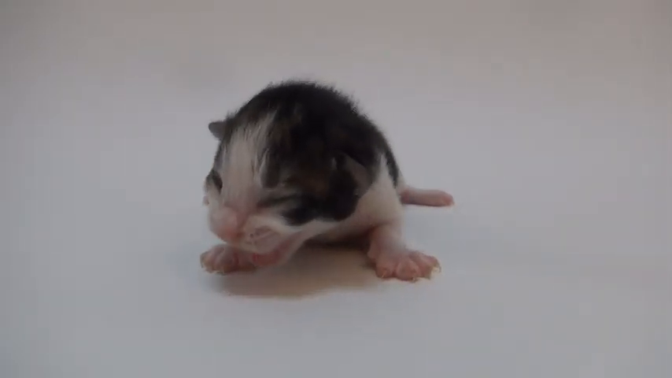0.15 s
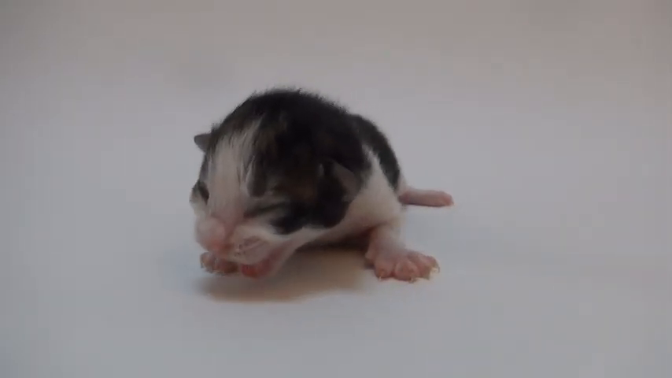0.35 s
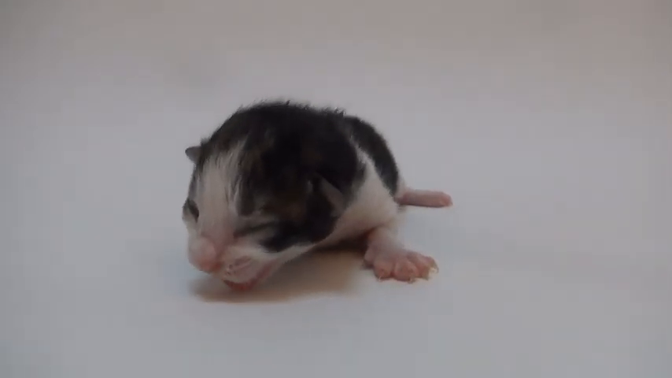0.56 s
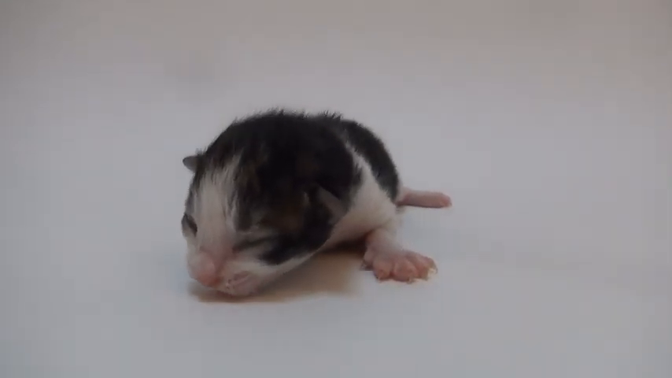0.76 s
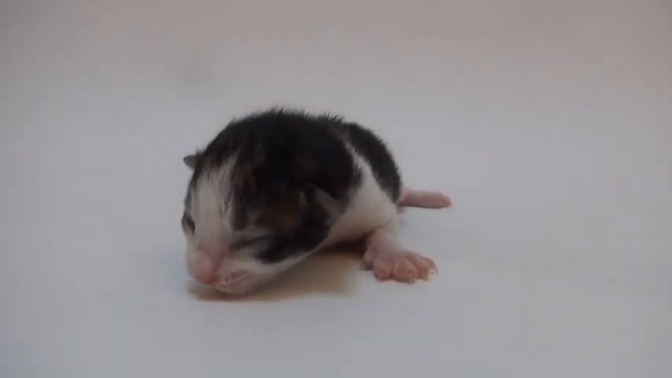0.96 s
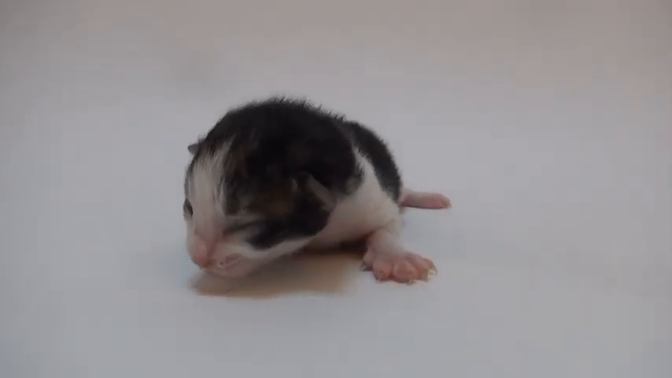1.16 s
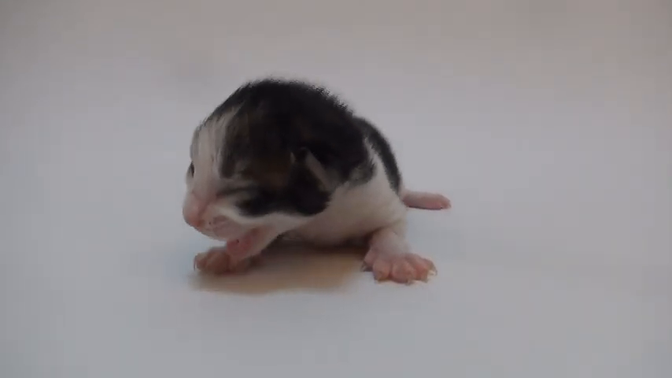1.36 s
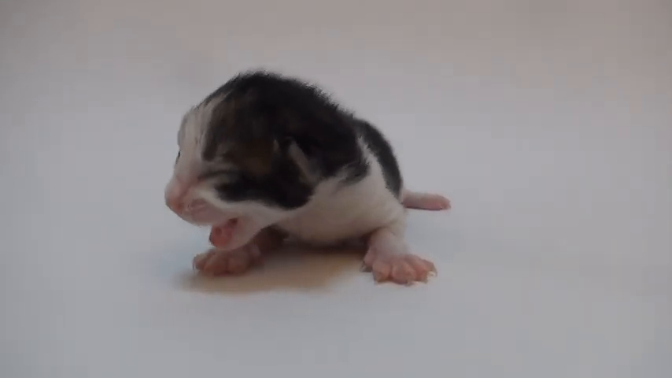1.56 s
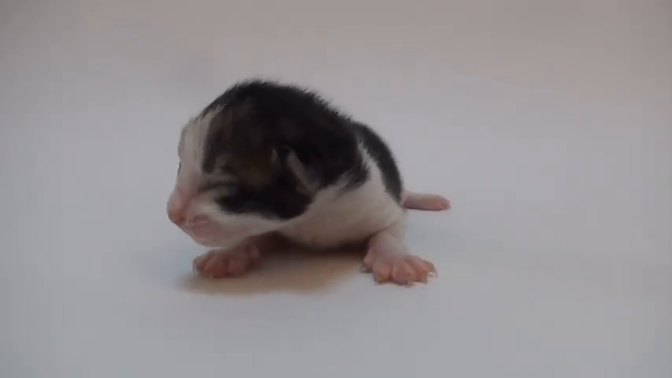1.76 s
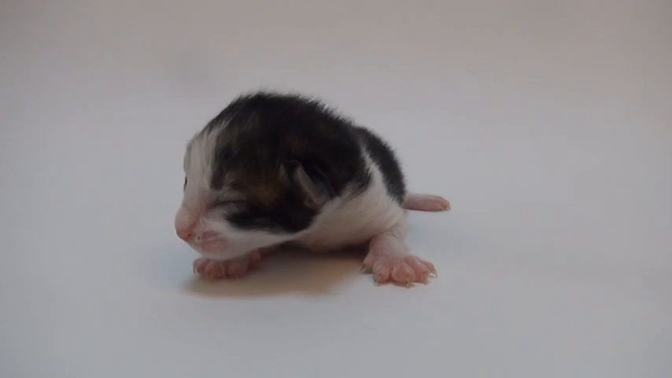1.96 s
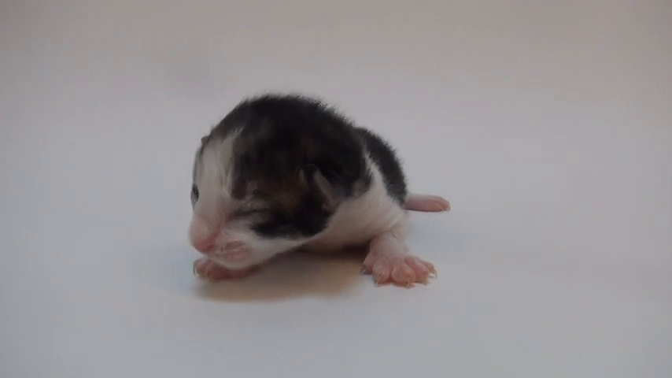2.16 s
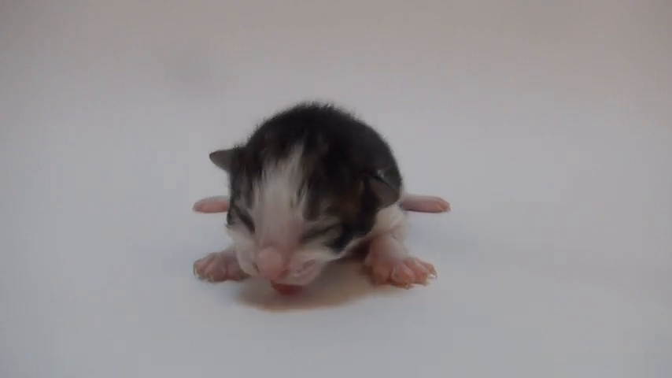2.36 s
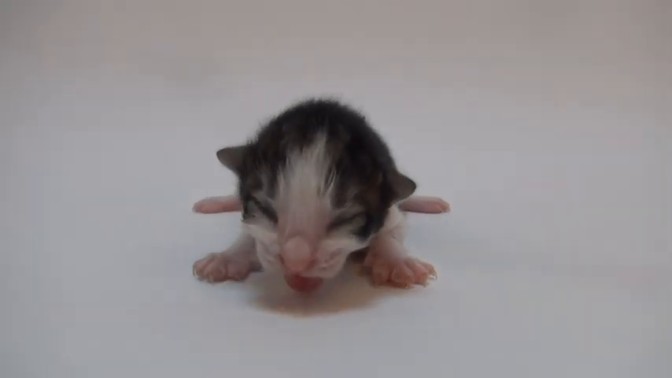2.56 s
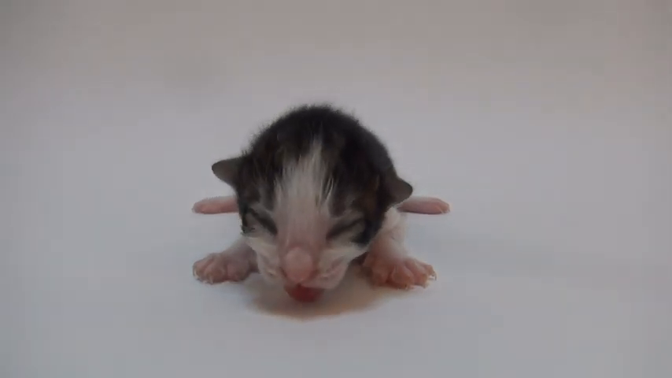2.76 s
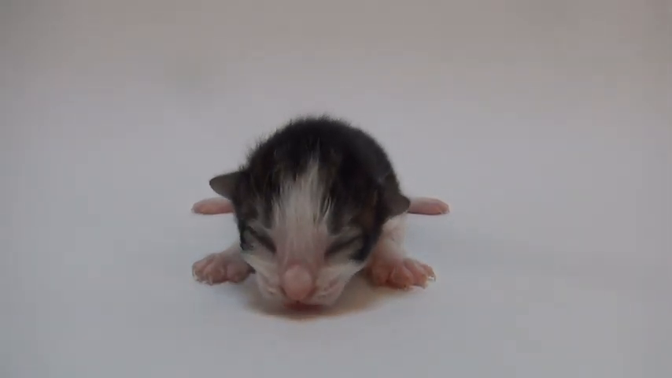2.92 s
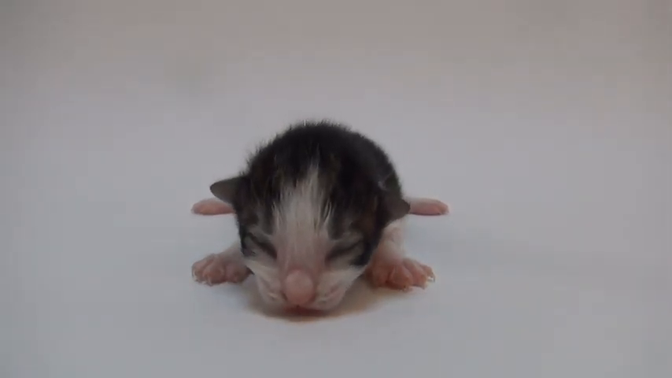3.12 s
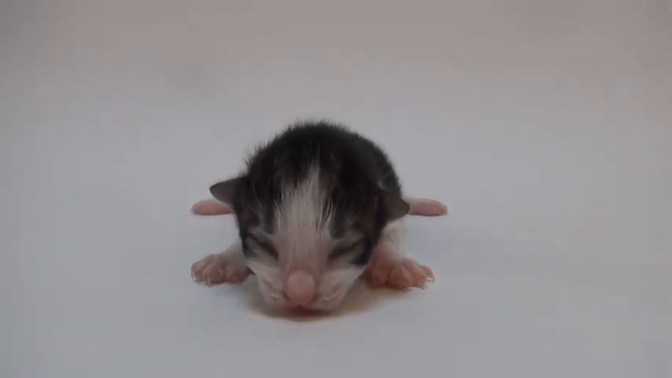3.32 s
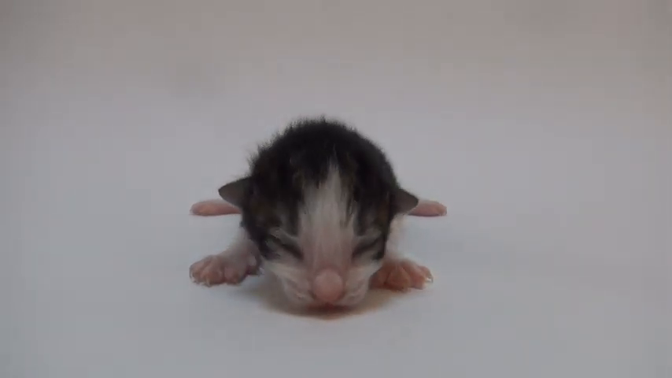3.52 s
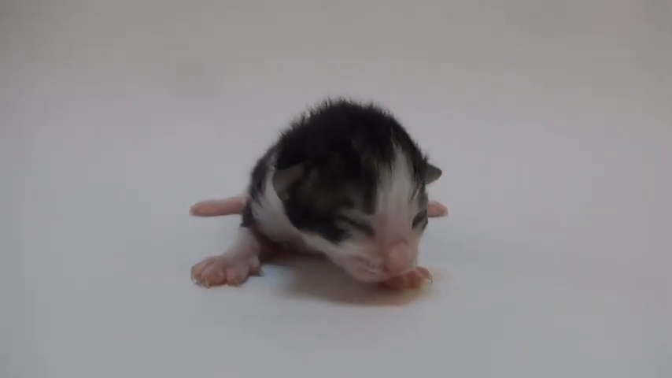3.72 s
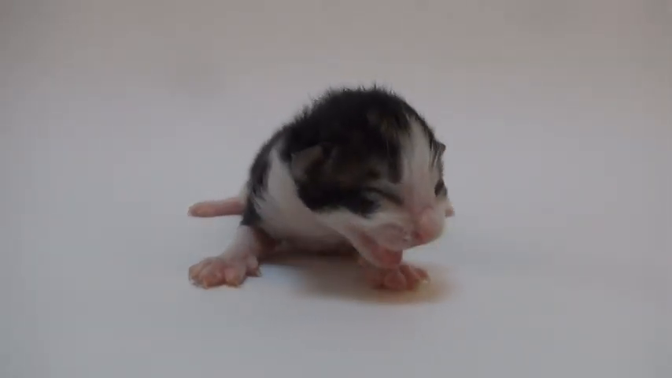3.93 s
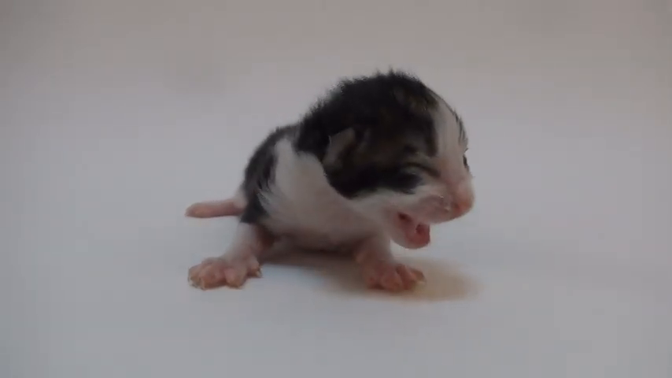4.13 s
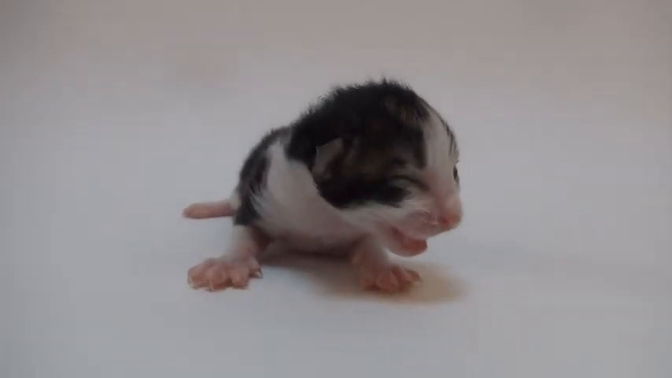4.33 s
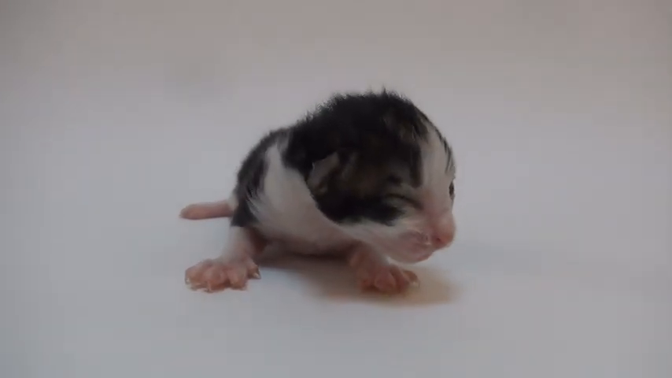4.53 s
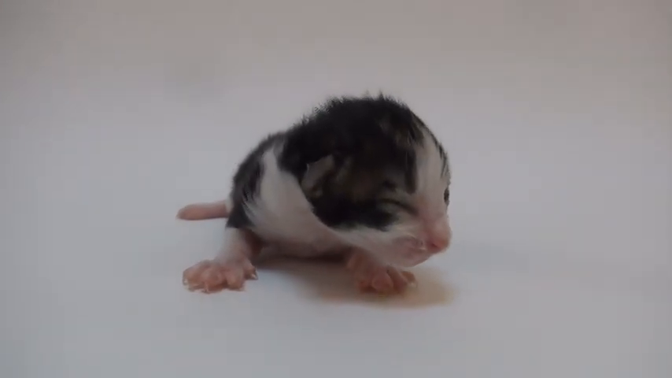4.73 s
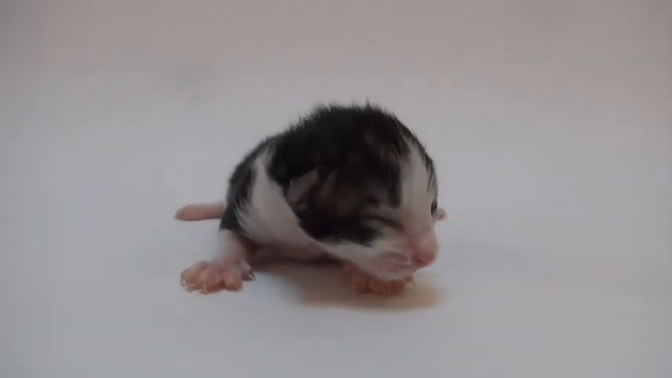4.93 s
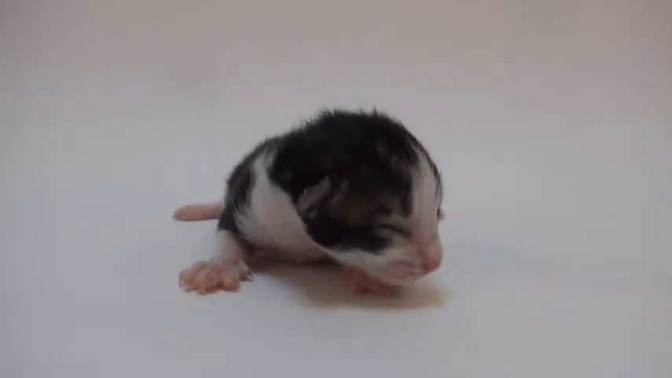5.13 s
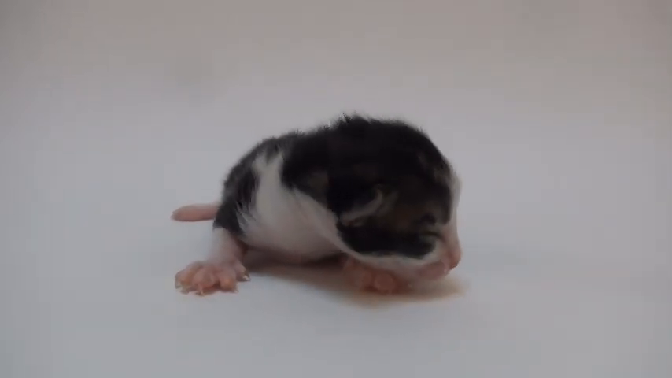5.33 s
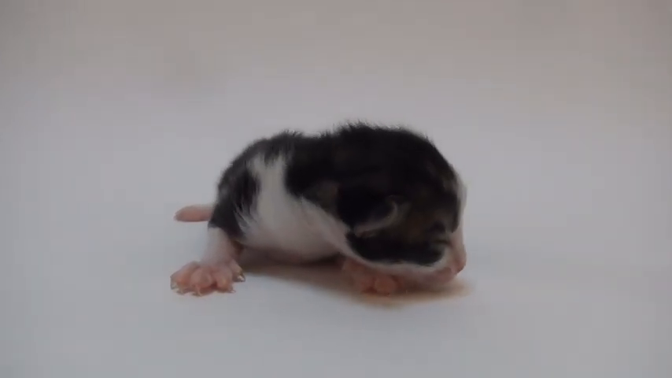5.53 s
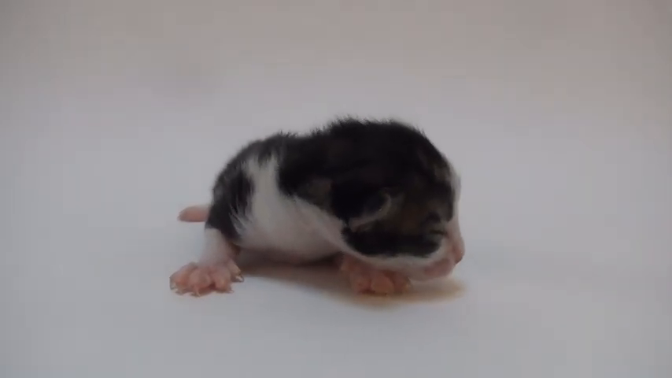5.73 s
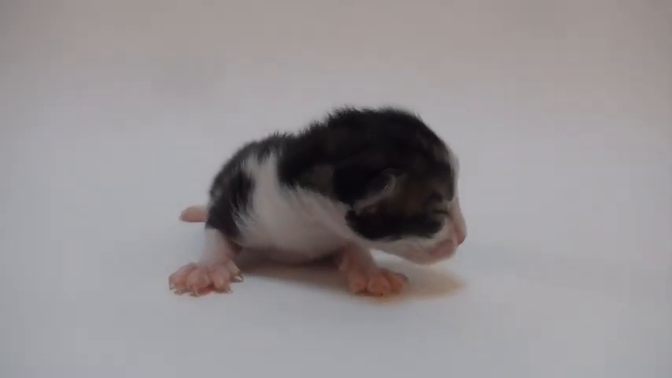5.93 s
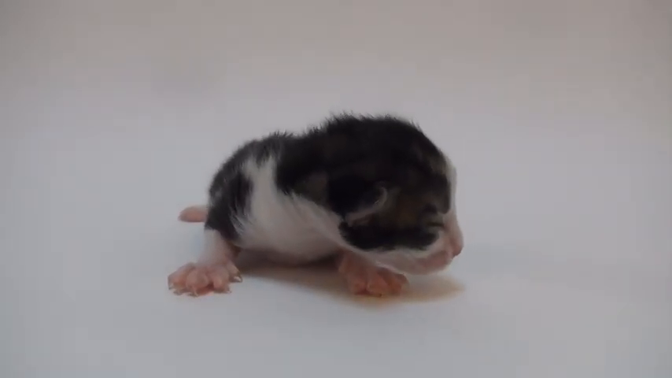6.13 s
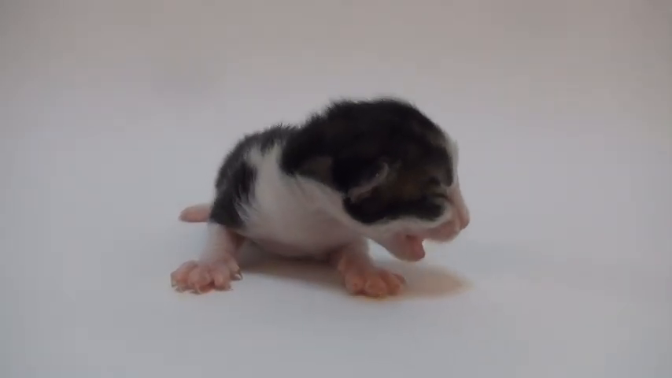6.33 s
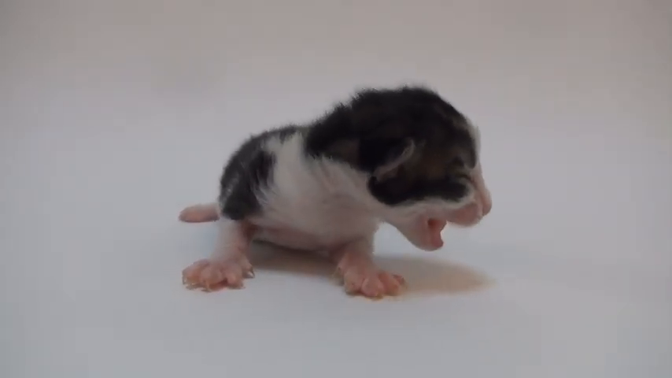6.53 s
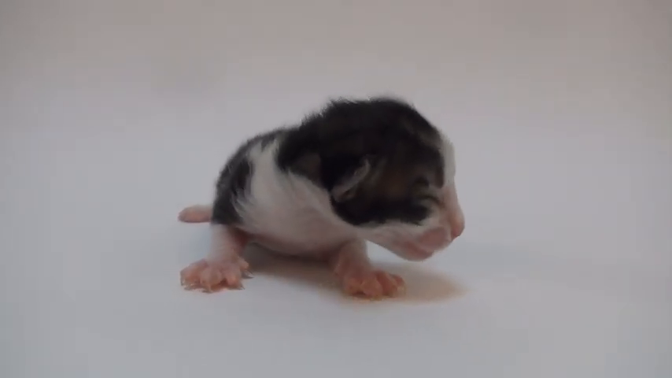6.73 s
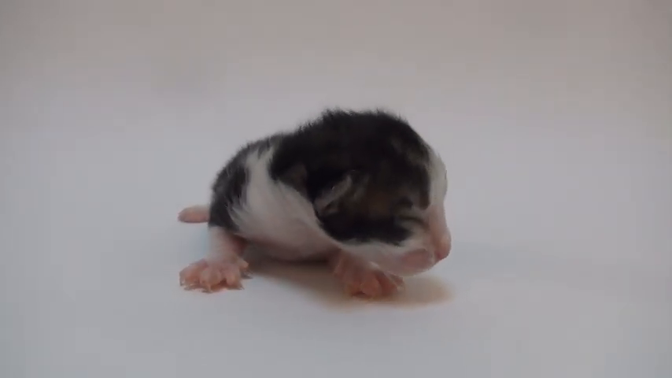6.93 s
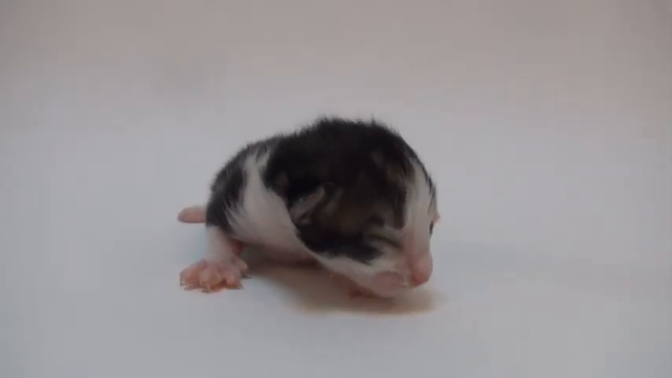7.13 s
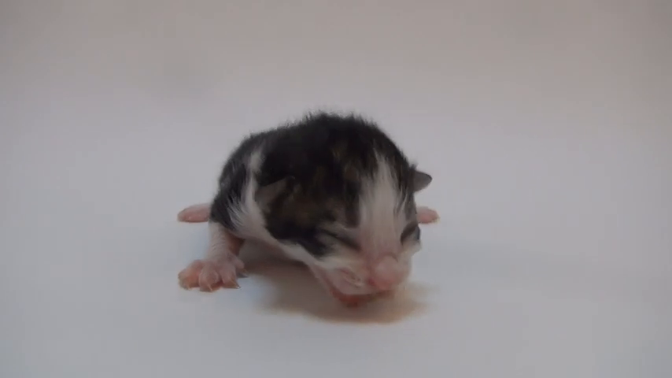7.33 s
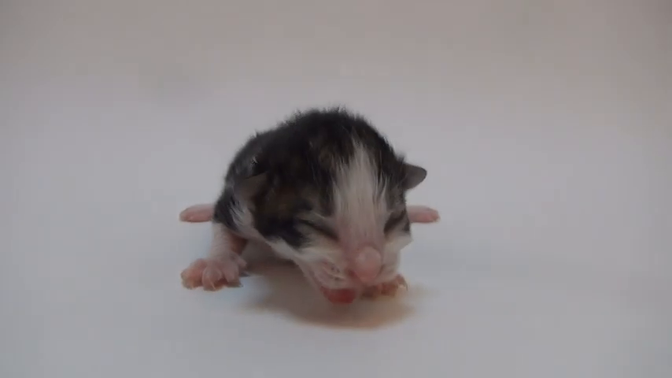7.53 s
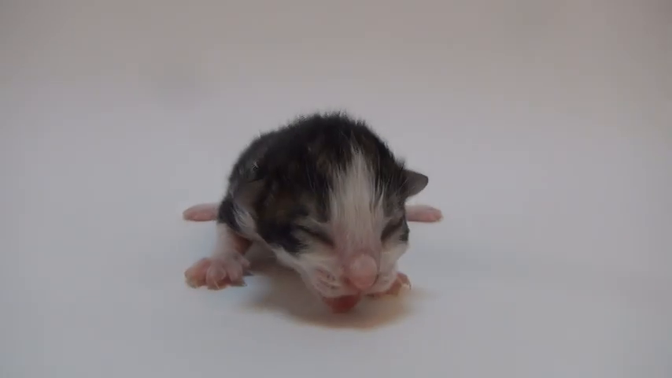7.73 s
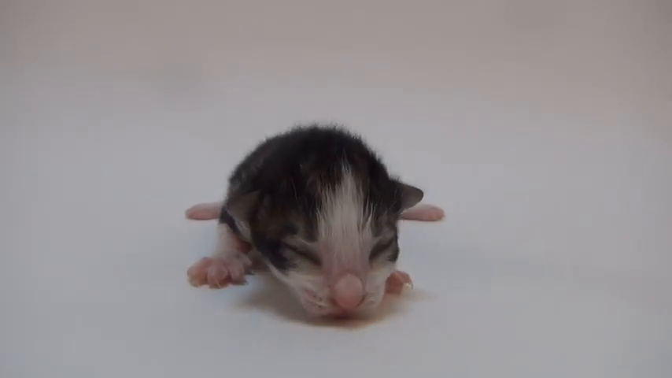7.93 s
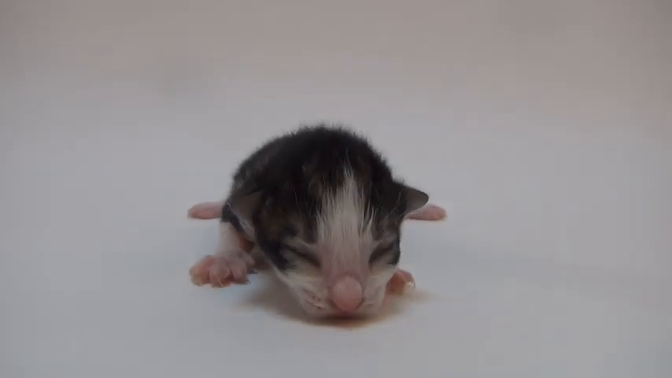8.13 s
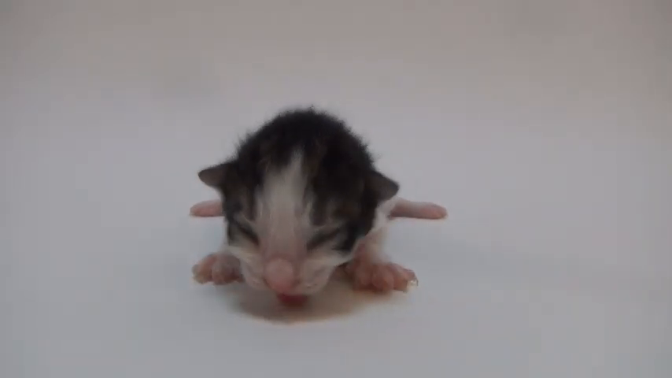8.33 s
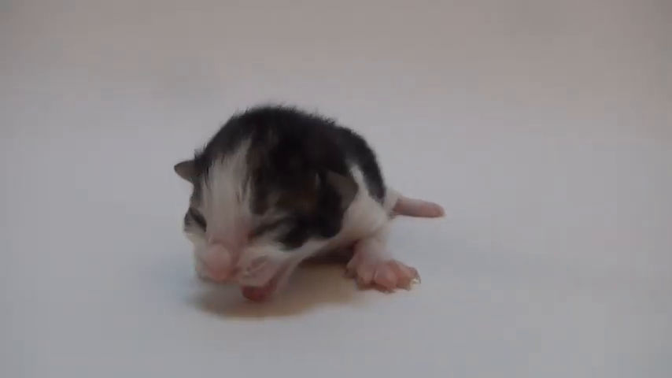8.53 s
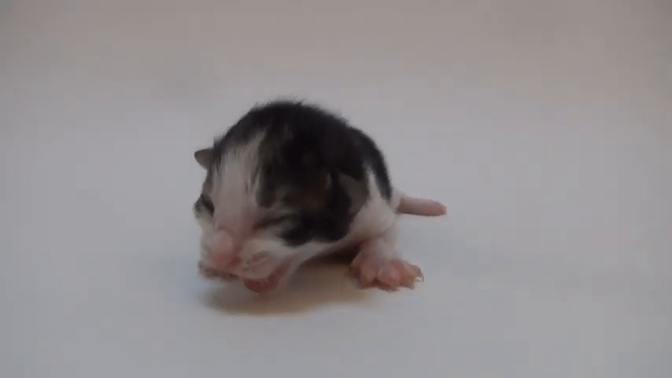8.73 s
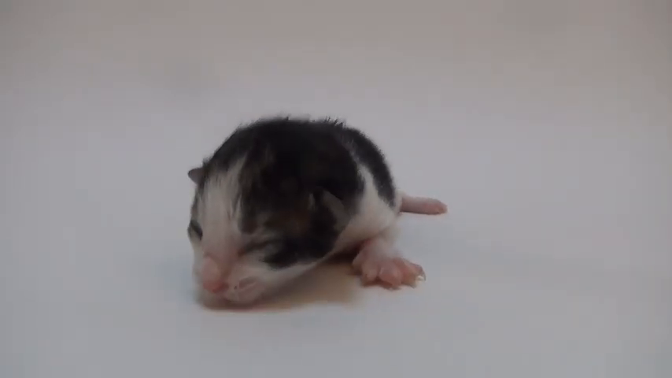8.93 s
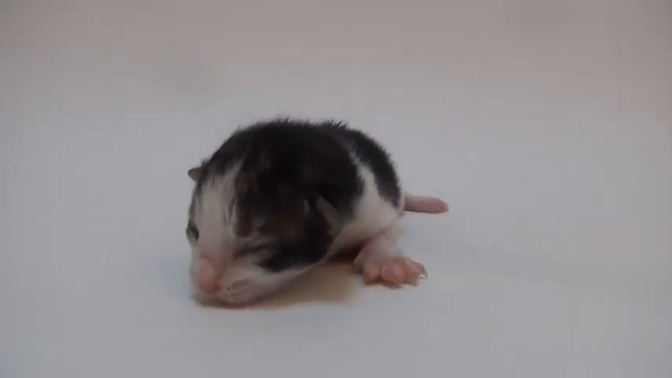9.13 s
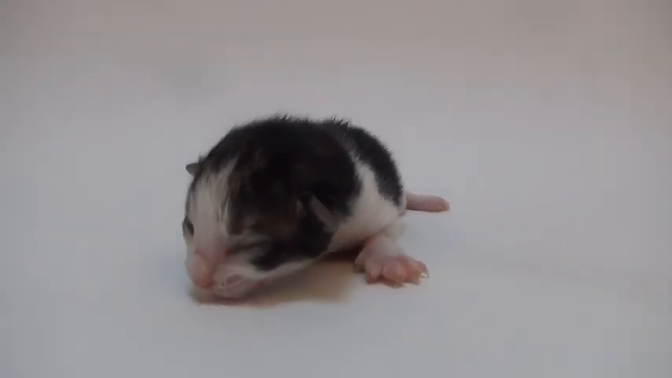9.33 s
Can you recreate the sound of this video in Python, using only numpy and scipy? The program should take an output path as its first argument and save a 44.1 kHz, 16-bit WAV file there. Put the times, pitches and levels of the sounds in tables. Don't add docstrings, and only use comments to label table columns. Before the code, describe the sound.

Close stereo sound of a newborn kitten on a hard table in a quiet room with a short reverberant tail. It is already crying at 0 s, until about 0.8 s: a thin, piercing, whistle-clean mew around 1.5 kHz with bright harmonics, leaping up in pitch and then slumping. Similar mews follow at 1.3-1.8, 2.3-3.0, 3.8-4.8 (longest, sinking, briefly rough), 6.3-6.85, 7.2-7.9 and 8.3-9.0 s; an eighth starts rising at 9.4 s and is cut off. Sharp tiny lip and claw ticks and soft breath puffs surround the onsets and endings. The longest pause, 4.8-6.2 s, has sparse dry fur rustles around 5.3-6.1 s. A faint airy fan hum with a tone near 880 Hz runs throughout, dipping under cries and creeping back. Low soft handling rumbles come near 0.2, 7.0 and 9.5 s.

```python
import sys
import numpy as np
from scipy import signal
from scipy.fft import rfft, irfft
from scipy.io import wavfile
from scipy.ndimage import uniform_filter1d

SR = 44100
rng = np.random.default_rng(int(sys.argv[2]) if len(sys.argv) > 2 else 0)


def volts(x):
    e = np.asarray(x, float) / 20
    return 10 ** e


def unload_audio(sound):
    columns = np.transpose(np.atleast_2d(sound))
    steps = np.round(np.clip(columns, -1, 1) * 32767)
    wavfile.write(sys.argv[1], SR, steps.astype(np.int16))


N = 417627


def evened(x):
    return x / np.sqrt(np.mean(x ** 2) + 1e-20)


def read(points, hz):
    f, value = np.transpose(points)
    return np.interp(np.log(hz + 1), np.log(f + 1), value)


def add(mix, s, sound):
    part = mix[..., round(s * SR):][..., :sound.shape[-1]]
    part += sound[..., :part.shape[-1]]


def resonate(x, hz, width):
    turn = np.exp(2j * np.pi * hz * np.arange(len(x)) / SR)
    r = np.exp(-np.pi * width / SR)
    return 2 * (turn * signal.lfilter([1 - r], [1, -r], x / turn)).real


def resonate_twice(x, hz, width):
    return resonate(resonate(x, hz, width), hz, width)


# frequency in Hz, left-right correlation from 0 to 1.
SAME = [(60, 0.81), (240, 0.98), (950, 0.99), (3770, 0.96), (15000, 0.46)]
# frequency in Hz, left minus right in dB.
TILT = [(60, -10), (240, -2.5), (950, 0), (3770, 0.5), (15000, -1.5)]


def coloured(db_of_hz, patchy_db):
    frames, hz = N // 512 + 5, np.fft.rfftfreq(2048, 1 / SR)
    a, b, c, d, patches = rng.standard_normal((frames, 1025, 5)).T
    patches = evened(uniform_filter1d(uniform_filter1d(patches, 14, 0), 5, 1))
    same = np.clip(read(SAME, hz), 0, 1)[:, None]
    left = a + 1j * b
    right = same * left + np.sqrt(1 - same ** 2) * (c + 1j * d)
    z = np.array([left, right]) * volts(db_of_hz(hz)[:, None] + patchy_db * patches)
    z *= volts(np.outer([.5, -.5], read(TILT, hz)))[..., None]
    return evened(signal.istft(z, nperseg=2048, noverlap=1536)[1][:, :N])


# frequency in Hz, density in dB per Hz.
FAN = [(35, -64), (60, -19.5), (186, -14), (437, -13), (734, -3.5), (807, -8.5), (887, 2.5), (1070, -10.5),
       (2030, -36.5), (2230, -18), (3330, -26), (3840, -28), (9200, -44.5), (15800, -40), (17000, -64)]
# frequency in Hz, width in Hz, level in dB.
WHINES = [(131.8, 7.3, -13), (871.5, 11, 12), (1714, 500, 4.5)]


def fan_spectrum(hz):
    tones = 0
    for f, width, db in WHINES:
        tones = tones + volts(db) ** 2 / width / (1 + (2 * (hz - f) / width) ** 2) ** 2
    return 10 * np.log10(volts(read(FAN, hz)) ** 2 + 20 * tones)


# frequency in Hz, width in Hz, level in dB.
MOTOR_LINES = [(134, 10, -23), (884, 12, -10), (1359, 2, -17), (1424, 2, -22), (2175, 1, -19)]
# frequency in Hz, level in dB.
HUM = [(285.3, -67), (328.4, -65.5), (608.3, -59), (710.6, -64)]
OPEN_DB, DUCK_DB, DUCK_S, FAN_DB = -52, -11, 0.87, 12.5


def fan():
    t = np.arange(N) / SR
    mewing = sum((t >= m[0][0]) & (t < m[-1][0]) for m in ALL_MEWS)
    keep = np.exp(-1 / (DUCK_S * SR))
    ducked = signal.lfilter([1 - keep], [1, -keep], mewing, zi=[0.7])[0]
    air = coloured(fan_spectrum, patchy_db=1.67)
    noise = rng.standard_normal(N)
    for hz, width, db in MOTOR_LINES:
        air += volts(db) * evened(resonate_twice(noise, hz, width))
    for hz, db in HUM:
        air += volts(db + 41.5) * evened(resonate_twice(noise, hz, 3.6))
    return volts(OPEN_DB + DUCK_DB * ducked + FAN_DB) * air


# time in seconds, length in seconds, level in dB.
BUMPS = [
    (0.158, 0.18, -55),
    (2.3, 0.38, -65),
    (3.998, 0.18, -69),
    (5.7, 1.3, -71),
    (7.042, 0.41, -55.5),
    (8.807, 0.3, -66),
    (9.45, 0.39, -61),
]
RUMBLE_DB = -70.5


def hand_rumble():
    t = np.arange(N) / SR
    rumble = coloured(lambda hz: -30 * abs(np.log2((hz + 1) / 46)) ** 1.5, patchy_db=2)
    hand = volts(RUMBLE_DB)
    for s, length, db in BUMPS:
        hand = hand + volts(db) * np.exp(-abs(t - s) / (length / 2))
    return hand * rumble


# frequency in Hz, decay time over 60 dB in seconds.
ROOM = [(500, 0.97), (1500, 0.48), (3000, 0.53), (4000, 0.27), (6000, 0.18), (12000, 0.31)]


def room(x):
    size = SR // 2
    taps = np.zeros((3, size))
    at = np.arange(220, size - 20, 20) + rng.integers(0, 20, (3, (size - 221) // 20))
    np.put_along_axis(taps, at, rng.choice([-1., 1.], at.shape), 1)
    hz, t, z = signal.stft(taps[0] + 0.1 * taps[1:], SR, nperseg=256)
    decay = volts(-60 * t / read(ROOM, hz)[:, None])
    tail = signal.istft(z * decay, SR, nperseg=256)[1]
    return signal.fftconvolve(x[None], tail / np.linalg.norm(tail[0]), axes=1)[:, :N]


# start in seconds, end in seconds, ticks per second.
RUSTLES = [
    (3.665, 3.71, 250),
    (5.32, 5.46, 260),
    (5.5, 5.57, 120),
    (5.63, 5.75, 180),
    (5.87, 5.89, 900),
    (5.93, 6.06, 150),
]
RUSTLE_DB, RUSTLE_SPREAD_DB, RUSTLE_HZ = -46, 2, 10400


def rustle():
    t = np.arange(N) / SR
    rate = sum(r * ((t > a) & (t < b)) for a, b, r in RUSTLES)
    clicks = (rng.random(N) < rate / SR) * volts(RUSTLE_DB + RUSTLE_SPREAD_DB * rng.standard_normal(N))
    u = np.arange(-40, 80) / SR
    tick = np.cos(2 * np.pi * RUSTLE_HZ * u) * np.exp(-abs(u) / .00003)
    return signal.oaconvolve(clicks, tick)[:N]


# start in seconds, length in seconds, level in dB, centre in Hz, width in Hz.
PUFFS = [(1.158, 0.17, -45.5, 1430, 2600), (1.247, .097, -59, 10940, 4000),
         (1.773, 0.036, -46.5, 7400, 2000), (1.779, 0.045, -55, 11500, 1500),
         (0.738, 0.038, -62, 7850, 4000), (2.21, .14, -47, 1490, 2500), (2.997, .045, -63, 8390, 4000),
         (3.43, .07, -67, 8400, 3000), (3.529, .097, -64, 8700, 6000), (3.663, .05, -66, 10000, 6040),
         (3.792, 0.023, -48, 2450, 2950), (4.085, .11, -48, 12500, 5000), (4.09, .08, -57, 7500, 2000),
         (4.237, .03, -57, 9550, 4000), (4.633, 0.74, -48.5, 990, 1730), (5.1, .04, -70, 6600, 200),
         (6.268, .055, -51, 7950, 1540), (3.425, 0.055, -58, 2750, 2000),
         (6.802, 0.075, -63, 11300, 1500), (6.807, .056, -51, 7000, 1500), (6.815, 0.23, -43.5, 590, 799),
         (7.29, 0.057, -50, 8000, 5070), (7.502, .082, -47, 14500, 3000), (7.506, .075, -46, 3500, 2500),
         (7.897, .041, -58, 8000, 6000), (8.276, 0.12, -49, 2390, 3520), (8.292, 0.11, -54, 8050, 5000),
         (8.963, .05, -65, 11200, 1500), (8.96, 0.056, -64, 6470, 2500), (9.375, 0.052, -51, 2460, 3000)]


def puffs():
    out, noise = np.zeros(N), rng.standard_normal(N)
    for s, length, db, hz, width in PUFFS:
        grain = noise[round(s * SR):][:round(length * SR)]
        band = resonate(resonate_twice(grain, hz, width), hz, width)
        add(out, s, volts(db) * evened(band) * signal.windows.tukey(len(grain), .6))
    return out


# time in seconds, peak level in dB, ring frequency in Hz.
TICKS = [(3.756, -52, 13000), (3.428, -44, 3000), (3.435, -37, 3000), (3.449, -42, 2980),
         (3.455, -39, 3000), (3.461, -45, 3000), (3.861, -36, 12000), (8.024, -48, 12100),
         (1.248, -44, 13000), (1.2708, -42, 11000), (1.2803, -33, 12000), (1.2878, -33, 11700),
         (1.373, -33, 13600), (1.8652, -42, 7400), (2.322, -23, 8100), (2.39, -29, 15000),
         (2.415, -36, 10500), (3.035, -46, 8000), (3.477, -32, 3000), (3.688, -36, 7000),
         (7.905, -40, 9000), (4.241, -31, 9500), (6.2162, -50, 10100), (6.604, -29, 11000),
         (7.282, -24, 6960), (7.289, -26, 14400), (9.029, -48, 13000), (9.433, -32, 6500),
         (2.17, -47, 7750), (2.2842, -40, 7160), (2.301, -38, 7080), (2.316, -28, 7200),
         (3.639, -42, 10700), (3.682, -35, 10250), (3.699, -33, 10640), (3.8206, -32, 11100),
         (3.8431, -32, 6915), (4.329, -37, 8560), (4.9879, -35, 6660), (5.1991, -33.5, 10600),
         (5.3847, -47, 8400), (5.404, -38, 6300), (5.6046, -35, 13600), (5.616, -37, 7900),
         (5.6294, -44, 11300), (5.7124, -45, 6660), (5.876, -34, 14100), (5.882, -32, 12900),
         (5.903, -41, 8940), (6.014, -42, 9600), (6.198, -41, 8270), (6.229, -43, 9000), (6.253, -25, 8400),
         (7.2642, -26, 11560), (7.272, -21, 8140), (8.3595, -21.5, 8300), (9.3506, -41, 13100),
         (9.44, -30, 7300)]


def ticks():
    out, noise = np.zeros(N), rng.standard_normal(N)
    t, lead = np.arange(300) / SR, .0025
    for s, db, hz in TICKS:
        grain = noise[round(s * SR):][:300]
        fizz = 0.31 * resonate_twice(grain, hz, 0.87 * hz) * np.exp(-abs(t - lead) / 0.001)
        ring = np.sin(2 * np.pi * hz * t) * np.exp(-abs(t - lead - .0002) * hz * 1.6)
        add(out, s - lead, volts(db) * (ring + fizz))
    return out


def smooth(x, length):
    for _ in range(2):
        x = uniform_filter1d(x, size=round(length * SR), axis=0, mode="nearest")
    return x


def glide(t, s, v):
    slope, i = np.gradient(v, s), np.clip(np.searchsorted(s, t) - 1, 0, len(s) - 2)
    h = np.diff(s)[i]
    u = np.clip((t - s[i]) / h, 0, 1)
    step = (v[i + 1] - v[i]) * u ** 2 * (3 - 2 * u)
    return v[i] + step + h * u * (1 - u) * (slope[i] * (1 - u) - slope[i + 1] * u)


# time in seconds, pitch factor, lean factor just before, overshoot factor
JUMPS = [(0.3205, 1.072, 1.002, 1.009), (0.6175, 0.847, 1.0, 1.044), (1.552, 1.088, 1.03, 1.006),
         (1.7265, 0.849, 1.022, 1.028), (2.447, 0.943, 0.986, 1.015), (2.5345, 1.199, 1.091, 0.982),
         (2.826, 1.031, 1.004, 1.003), (2.887, 0.831, 0.987, 1.033), (4.0105, 0.964, 1.0, 0.991),
         (4.068, 1.203, 1.023, 0.972), (4.416, 0.917, 1.001, 0.973), (4.441, 1.1, 1.043, 1.0),
         (4.451, 0.925, 1.019, 0.955), (6.445, 1.054, 0.997, 1.046), (6.7135, 0.872, 1.011, 1.005),
         (7.437, 1.191, 1.065, 1.04), (7.575, 1.026, 0.96, 0.96), (7.8085, 0.868, 1.008, 1.001),
         (8.504, 0.999, 1.041, 1.002), (8.557, 1.128, 0.998, 1.043), (8.851, 0.859, 1.006, 1.011)]
# time in seconds, half length in seconds, rise in percent.
BENDS = [(.042, .008, -1.2), (.138, .026, -.7), (.346, .018, 1), (.69, .026, -2.6), (1.294, .008, 1.5),
         (1.318, .01, -1.3), (1.334, .04, -1.2), (1.398, .012, 1.4), (1.422, .012, -1.3), (1.462, .012, .9),
         (1.662, .04, -.9), (1.774, .012, -2), (2.304, .012, -2.3), (2.464, .04, -.7), (2.576, .008, 1.2),
         (2.712, .018, -.8), (2.744, .012, 1.2), (2.976, .018, -.9), (3.844, .018, 1), (3.94, .012, -1.2),
         (4.26, .018, -1.2), (4.7, .018, -2.5), (4.465, .008, 2.5), (4.737, .014, 5), (6.268, .008, 1.9),
         (6.292, .012, -2.2), (6.404, .026, -.8), (6.476, .012, -2.2), (6.748, .008, -1.3),
         (6.78, .012, -2.8), (7.29, .008, 1.7), (7.306, .008, -1.3), (7.674, .04, .6), (7.866, .008, 1.2),
         (7.89, .008, -1.6), (7.906, .008, 2.2), (8.346, .026, 2.7), (8.37, .008, 1.4), (8.394, .012, -1.9),
         (8.458, .012, -1.2), (8.746, .012, 1.1), (8.818, .012, -1.1), (8.898, .008, -1.8),
         (8.938, .008, 1.9), (9.424, .008, 1.5)]
JUMP_S, LEAN_S, SETTLE_S = .004, .012, .02
SNAP_UP, SNAP_DOWN = 1.045, .93
WAVER, WAVER_S = .0026, .009


def fold_pitch(t, s, pitch):
    factor, register = np.ones(len(t)), np.zeros(len(t), int)
    for when, step, lean, overshoot in JUMPS:
        if s[0] < when < s[-1]:
            gap = abs(t - when)
            after = step * overshoot ** np.exp(-gap / SETTLE_S)
            factor *= np.where(t > when, after, lean ** np.exp(-gap / LEAN_S))
            if not SNAP_DOWN < step < SNAP_UP:
                register[t > when] = 1 if step > 1 else 2
    for when, half, percent in BENDS:
        if s[0] < when < s[-1]:
            factor *= 1 + percent / 100 * np.exp(-((t - when) / half) ** 2)
    waver = WAVER * evened(smooth(rng.standard_normal(len(t)), WAVER_S))
    return np.exp(glide(t, s, np.log(pitch)) + waver) * smooth(factor, JUMP_S), register


# 1st harmonic in dB, 2nd in dB, 3rd in dB, all higher ones in dB.
REGISTERS = [
    (0.14, 2.5, 2, -12.5),
    (5, -1, -3, -14.5),
    (-0.5, 1.85, -4, -11.5),
]
MOUTH_Q = 3.17
RING_HZ, RING_WIDTH_HZ, RING_DB, RING_OPEN_HZ = 3930, 150, 5.5, 3260
CHEST_HZ, CHEST_WIDTH_HZ, CHEST_DB = 3030, 480, -10
TOP_DB_PER_MOUTH_OCTAVE, TOP_DB_PER_PITCH_OCTAVE = 19, -2


def folds(curve, t):
    s, pitch, *columns = np.transpose(curve)
    effort_db, mouth_hz = (np.interp(t, s, c) for c in columns)
    hz, register = fold_pitch(t, s, pitch)
    db = effort_db + smooth(np.array(REGISTERS, float)[register], JUMP_S).T
    near = np.arange(1, 4)[:, None] * hz / mouth_hz
    db[:3] -= 10 * np.log10((1 - near ** 2) ** 2 + (near / MOUTH_Q) ** 2)
    rising, third_hz = register == 0, 3 * hz
    wide = np.clip((mouth_hz - RING_OPEN_HZ) / 600, 0, 1) * rising
    db[2] += RING_DB * wide * np.exp(-((third_hz - RING_HZ) / RING_WIDTH_HZ) ** 2)
    db[2] += CHEST_DB * rising * np.exp(-((third_hz - CHEST_HZ) / CHEST_WIDTH_HZ) ** 2)
    db[3] += TOP_DB_PER_MOUTH_OCTAVE * np.log2(mouth_hz / 2500)
    db[3] += TOP_DB_PER_PITCH_OCTAVE * np.log2(hz / 1400)
    return hz, volts(db)


# start in seconds, end in seconds, early-late alternation in cycles,
# random timing scatter in cycles.
BREAKS = [(2.505, 2.54, .006, .001), (2.54, 2.62, .001, .0015), (4.075, 4.17, 0, .003),
          (4.417, 4.442, .014, .004), (4.455, 4.495, .022, .003), (6.29, 6.41, 0, .002),
          (7.51, 7.575, .003, .005), (8.545, 8.56, .002, .001), (8.6, 8.645, .002, .002),
          (3.95, 3.99, 0, .002), (.322, .42, 0, .0015), (.03, .15, 0, .0006), (1.4, 1.46, 0, .0012),
          (1.555, 1.6, 0, .0015), (2.445, 2.5, 0, .001), (2.62, 2.84, 0, .0008), (6.45, 6.62, 0, .001)]


def unsteadiness(t, start, end, grit):
    shift, loose, uneven = .0003 * grit, np.zeros(len(t)), np.zeros(len(t))
    for s0, s1, alternation, scatter in BREAKS:
        if start <= s0 <= end:
            on = np.clip(np.minimum(t - s0, s1 - t) / .004, 0, 1)
            shift += on * scatter * grit
            uneven += on * alternation
            loose += on
    return shift, loose, uneven


# frequency in Hz, level in dB.
UPPER = [(2000, 15), (4200, 8), (5600, -2.5), (7400, -3.5), (9500, -10), (11500, -8), (13500, -16),
         (15000, -12.5), (16500, -18)]
# frequency in Hz, dB lost per octave of pitch under 1300 Hz.
SHUT = [(3500, 1.3), (5200, 12), (8000, -10), (11000, -3), (16000, 9)]
# time in seconds, half length in seconds,
# frequency in Hz, level in dB.
SHAPES = [(0.01, 0.018, 8200, 10), (0.196, 0.068, 10700, -23), (.2, .12, 16200, 13), (.45, 0.21, 14200, 11),
          (0.66, 0.12, 11500, 17), (1.31, 0.035, 9200, 25.5), (1.31, 0.032, 12500, 16),
          (1.616, .06, 9850, -6), (1.67, 0.042, 13100, 13), (1.74, 0.057, 11900, 16),
          (2.704, 0.17, 13800, 15.5), (2.74, 0.076, 9700, -17), (2.91, 0.096, 11000, 12.5),
          (2.92, .04, 15940, 15), (4.16, 0.11, 9300, -14), (4.32, 0.1, 12550, 14),
          (4.501, 0.097, 11800, 17), (4.484, 0.088, 5930, -11), (4.55, 0.08, 8500, 14),
          (6.296, 0.019, 7800, 12.5), (6.685, 0.082, 12500, 8.5), (7.498, 0.07, 10700, 10),
          (7.75, 0.11, 13800, 16), (7.85, .04, 16070, 12), (7.85, .04, 11500, 10), (8.41, 0.04, 14000, 8),
          (8.7, .12, 13000, 5), (8.65, .09, 15700, 12), (8.908, 0.11, 12100, 17.5), (8.92, 0.049, 16020, 9),
          (8.93, .05, 13800, -9), (9.45, .03, 15100, -15), (0.509, 0.092, 9300, -10),
          (4.747, 0.065, 2800, 14), (1.277, .02, 5840, 28), (3.835, 0.022, 5500, -8),
          (4.738, 0.11, 9550, -22), (4.623, 0.062, 14000, -7), (4.42, .1, 15400, -5),
          (6.38, .06, 15400, -17), (1.77, .04, 15500, 6), (6.86, .04, 8600, -12)]
SHAPE_WIDTH_HZ, DIPS_DB = 1550, 3.5


def upper_weights(t, hz, high, bright_db, mouth, unparted_db):
    slow = slice(None, None, 32)
    ts = t[slow]
    f = high * hz[slow]
    lean_db = bright_db * np.log2(np.maximum(f / 7000, 1))
    lean_db += read(SHUT, f) * np.log2(np.minimum(hz[slow] / 1300, 1))
    dip_turns = 2 * np.pi * rng.uniform(1, 4, high.shape) * ts
    dips_db = DIPS_DB * np.sin(dip_turns + rng.uniform(0, 7, high.shape))
    weights = volts(read(UPPER, f * mouth) + lean_db + dips_db * (high > 5)) * (f < 17000)
    shape_db = unparted_db[slow] * (f > 5000)
    for s, half, f_hz, db in SHAPES:
        if t[0] <= s <= t[-1]:
            shape_db = shape_db + db * np.exp(-((ts - s) / half) ** 2 - ((f - f_hz) / SHAPE_WIDTH_HZ) ** 2)
    weights = volts(shape_db) * weights / np.sqrt((weights ** 2).sum(0))
    return np.repeat(weights, 32, axis=1)[:, :len(t)]


LIPS_S, UNPARTED_DB, CLOSED_DB, CLOSED_THIRD_DB = 0.0069, -10, -6.5, -9
TOP_DIES_S, TOP_DIES_DB = 0.038, -3.5
HALF_LINE, LEAK_DB = 27, -25


def mew(curve, bright_db, mouth, top_db, part, close, air, grit):
    start, end = curve[0][0], curve[-1][0]
    at = np.arange(round(max(start - .045, 0) * SR), min(round((end + .035) * SR), N))
    t = at / SR
    before = t < start
    outside = np.maximum(np.maximum(start - t, t - end), 0)
    hz, (first, second, third, upper) = folds(curve, t)
    hz = hz * (1 - 6. * outside)
    turns = np.cumsum(hz) / SR
    shift, loose, uneven = unsteadiness(t, start, end, grit[at])

    dying = (end < 9.4) * np.clip(1 - (end - t) / TOP_DIES_S, 0, 1)
    upper = upper * volts(top_db + TOP_DIES_DB * dying)
    upper = upper * np.clip(1 - outside / np.where(before, .025, .012), 0, 1)
    closed = np.clip((t - close) / LIPS_S, 0, 1)
    third, upper = third * volts(CLOSED_THIRD_DB * closed), upper * volts(CLOSED_DB * closed)
    unparted_db = UNPARTED_DB * np.clip((part - t) / LIPS_S, 0, 1)

    orders = np.arange(1, 25)[:, None]
    alternation = np.where(orders > 1, 1, .4) * uneven * np.cos(np.pi * turns)
    cycles = orders * ((turns + shift + alternation) % 1)
    waves = np.cos((2 * np.pi * cycles + .3 * orders ** 2).astype(np.float32))
    weights = upper_weights(t, hz, orders[3:], bright_db, mouth, unparted_db)
    tone = first * waves[0] + second * waves[1] + third * waves[2]
    tone += upper * (weights * waves[3:]).sum(0)
    tone += HALF_LINE * uneven * second * np.cos(3 * np.pi * (turns + 4 * shift))
    leak = volts(LEAK_DB) * upper * air[at] * (1 + loose) * volts(unparted_db)
    fade = np.clip(1 - outside / np.where(before, .045, .03), 0, 1) ** np.where(before, 1.5, 2)
    return t[0], (np.sqrt(2) * tone + leak) * fade


# frequency in Hz, level in dB.
AIR = [(400, -30), (3000, -10), (5500, -20), (7400, -2), (9300, -12), (11500, -2), (13500, -4),
       (17000, -18)]
# left minus right in dB, brightness in dB per octave above 7 kHz,
# mouth size factor, level of the upper harmonics in dB.
HEAD = [(1.5, -2.5, 0.59, -0.5), (1.5, -8, 0.92, -0.5), (0.75, -7, 1.015, -0.7), (-1, 3, 0.986, 2.5),
        (-1.53, 0, 0.955, 0.6), (0.04, -4.5, 1.055, -1.4), (1, -10, 1.1, -1.2), (1.1, 3.5, 1.9, -5.5)]
# parting in seconds, closing in seconds, swing of left minus right in dB to
LIPS = [
    (-.1, 0.728, 0.26),
    (1.288, 1.801, 0.2),
    (2.33, 2.98, -0.05),
    (3.856, 4.665, -0.2),
    (6.271, 6.818, -0.1),
    (7.293, 7.892, 1.4),
    (8.368, 8.957, 0.4),
    (9.443, 9.9, 1),
]
# time in seconds, fold pitch before
# any register jump in Hz, effort in dB, mouth resonance in Hz.
MEW_1 = [
    (0.0, 1090, -48, 3000),
    (0.05, 1422, -35, 3710),
    (0.16, 1483, -24.5, 2620),
    (0.38, 1448, -24.5, 2470),
    (0.46, 1398, -26, 2560),
    (0.55, 1305, -28, 2510),
    (0.59, 1276, -30, 2350),
    (0.755, 730.5, -43, 2140),
    (0.777, 624.5, -51, 3410),
]
# as in the first, in seconds, Hz, dB, Hz.
MEW_2 = [
    (1.257, 713, -61, 3280),
    (1.277, 920, -53.5, 2900),
    (1.368, 1470, -34.5, 3390),
    (1.462, 1435, -25.5, 2530),
    (1.607, 1410, -26, 2520),
    (1.633, 1374, -27, 2440),
    (1.782, 982, -36, 2520),
    (1.817, 721.6, -33, 2900),
    (1.836, 688, -41, 3100),
]
# as in the first, in seconds, Hz, dB, Hz.
MEW_3 = [
    (2.279, 689, -53, 3635),
    (2.323, 1038, -46, 4170),
    (2.349, 1146, -36.5, 4160),
    (2.395, 1339, -30, 3280),
    (2.63, 1365, -26, 2700),
    (2.724, 1289, -26, 2980),
    (2.945, 958, -34, 2400),
    (2.965, 882.4, -38.5, 2290),
    (3.032, 668, -44.5, 3793),
]
# as in the first, in seconds, Hz, dB, Hz.
MEW_4 = [
    (3.806, 677, -71, 3340),
    (3.825, 800, -45, 3760),
    (4.017, 1420, -25.5, 2460),
    (4.142, 1364, -27.5, 2320),
    (4.471, 1094, -30, 2040),
    (4.491, 1051, -31.5, 1814),
    (4.621, 902, -34.5, 1780),
    (4.73, 629.5, -42.5, 1710),
    (4.773, 513, -46.5, 2650),
]
# as in the first, in seconds, Hz, dB, Hz.
MEW_5 = [
    (6.251, 726, -56, 5330),
    (6.337, 1236, -33, 3630),
    (6.356, 1290, -34.5, 4000),
    (6.376, 1383, -30, 3280),
    (6.595, 1512, -27.5, 2190),
    (6.661, 1483, -29, 2200),
    (6.806, 989, -37.5, 2646),
    (6.826, 845, -33, 2500),
    (6.849, 760, -41, 1900),
]
# as in the first, in seconds, Hz, dB, Hz.
MEW_6 = [
    (7.235, 514.7, -51, 4100),
    (7.275, 871, -50, 5060),
    (7.325, 1174, -34, 4200),
    (7.545, 1377, -25, 2770),
    (7.67, 1291, -25, 2750),
    (7.739, 1262, -26.5, 2600),
    (7.825, 1119, -32, 2620),
    (7.89, 800, -39, 3094),
    (7.933, 680, -41, 3340),
]
# as in the first, in seconds, Hz, dB, Hz.
MEW_7 = [
    (8.326, 653, -54, 4630),
    (8.347, 834, -47.5, 5360),
    (8.401, 1198, -35, 4420),
    (8.527, 1458, -28, 3050),
    (8.721, 1399, -24.5, 2590),
    (8.841, 1289, -29.5, 2500),
    (8.886, 1178, -33.5, 2660),
    (8.966, 765, -40, 3000),
    (8.988, 732, -43.5, 3360),
]
# as in the first, in seconds, Hz, dB, Hz.
MEW_8 = [
    (9.396, 591, -54, 4050),
    (9.421, 857, -50, 4100),
    (9.442, 1030, -44, 4720),
    (9.466, 1120, -38.5, 5000),
]
ALL_MEWS = [MEW_1, MEW_2, MEW_3, MEW_4, MEW_5, MEW_6, MEW_7, MEW_8]


def kitten():
    hz = np.fft.rfftfreq(N, 1 / SR)
    air = evened(irfft(rfft(rng.standard_normal(N)) * volts(read(AIR, hz)), N))
    grit = evened(uniform_filter1d(uniform_filter1d(rng.standard_normal(N), size=24), size=24))
    out = np.zeros((2, N))
    for curve, (pan_db, *mouth), (*lips, turn_db) in zip(ALL_MEWS, HEAD, LIPS):
        s, sound = mew(curve, *mouth, *lips, air, grit)
        pan_db = pan_db + turn_db * np.linspace(-1, 1, len(sound))
        add(out, s, sound * volts(np.array([pan_db / 2, -pan_db / 2])))
    return out


ROOM_DB = -13.5


def scene():
    background = fan() + hand_rumble()
    near = kitten() + puffs() + ticks()
    return near + volts(ROOM_DB) * room(near.mean(0)) + background + rustle()


def low_pass(x):
    return signal.sosfilt(signal.butter(12, 17770, fs=SR, output="sos"), x)


def record(dry):
    edge = signal.firwin(511, 16490, window=("kaiser", 9), fs=SR)
    mix = signal.oaconvolve(dry, edge[None], "same")
    return low_pass(mix)


dry = scene()
out = record(dry)
unload_audio(out)
```